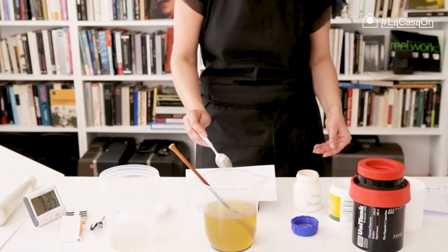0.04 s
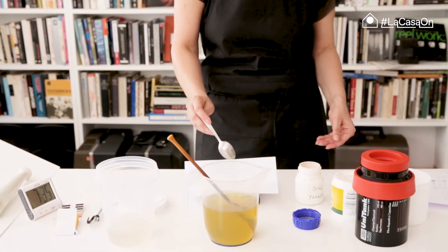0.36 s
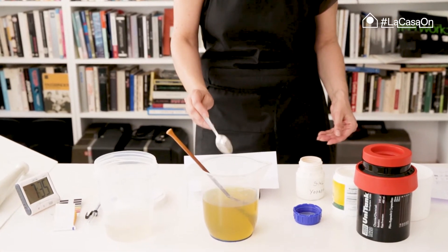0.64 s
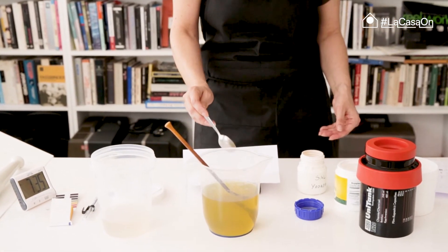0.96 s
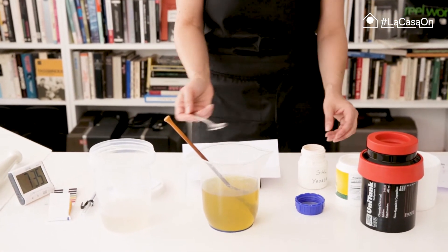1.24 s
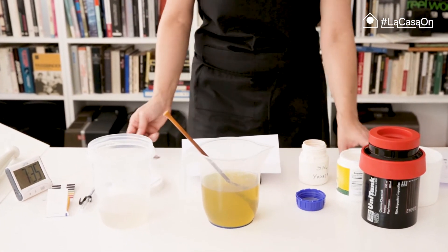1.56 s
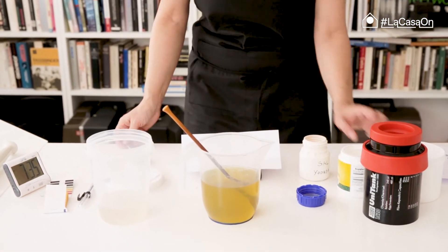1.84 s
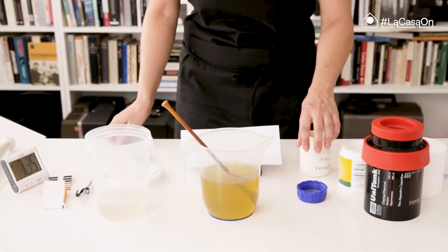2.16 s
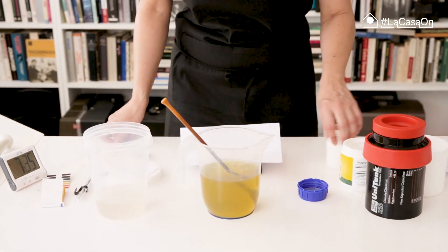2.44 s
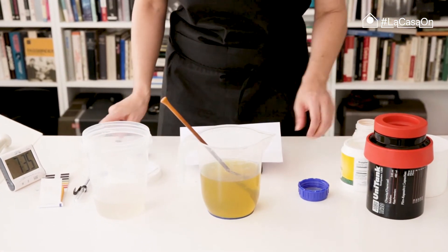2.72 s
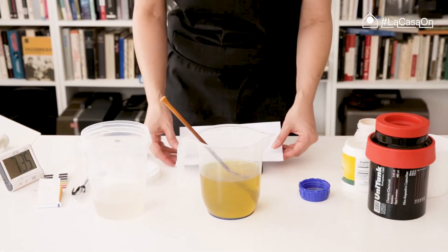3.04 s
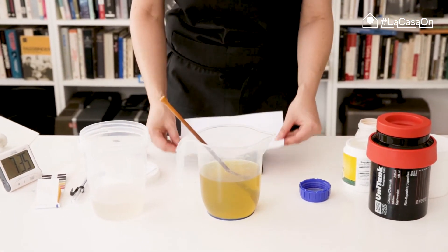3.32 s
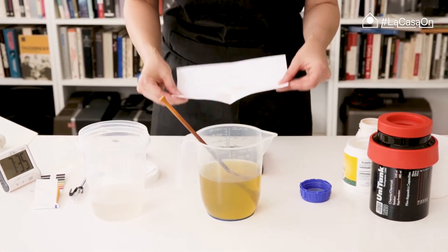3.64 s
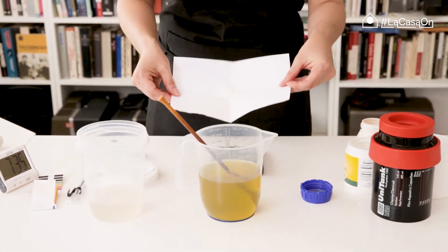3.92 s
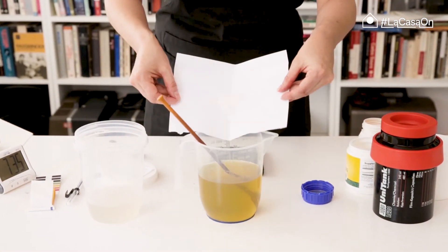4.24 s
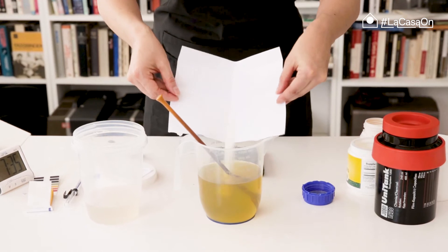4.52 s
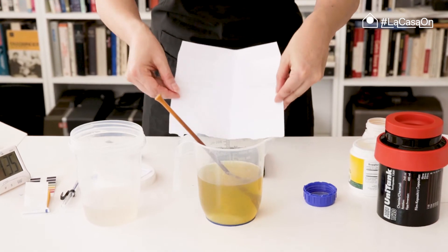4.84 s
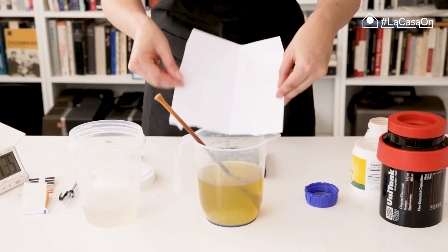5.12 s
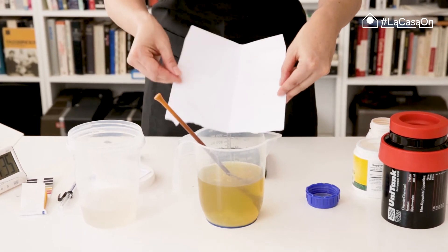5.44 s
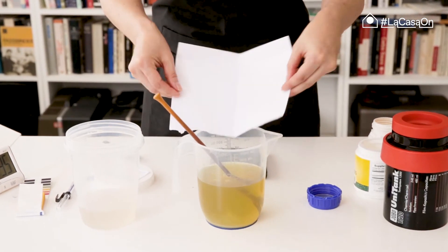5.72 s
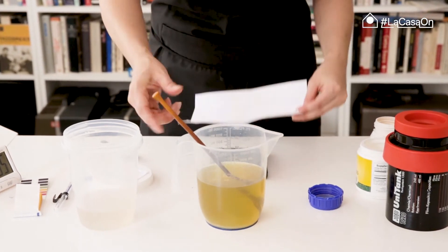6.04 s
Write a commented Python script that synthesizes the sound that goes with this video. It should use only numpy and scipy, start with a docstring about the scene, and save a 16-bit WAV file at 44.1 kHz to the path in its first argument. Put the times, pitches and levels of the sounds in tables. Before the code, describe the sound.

A small, quiet room is heard through one microphone, with faint hiss and soft, low handling bumps. At about 1.7 seconds a spoon lands on the table with a single knock. Around 2.3 seconds fingernails tick on a glass jar, which judders across the tabletop and, from 2.5 to 2.7 seconds, clatters against hollow plastic containers with a faint high ring. This is the loudest moment. Faint finger scuffs follow near 3.1 seconds. A folded sheet of paper buckles at 4.1 seconds, and from about 4.2 to 4.8 seconds salt hisses down it into a jug of liquid, with a few short, sharp plops near 4.5 seconds. From 4.9 to about 6 seconds the sheet is shaken out, snapping, crackling and tapping hollowly on the plastic rim. The last light touches fade by 6.2 seconds. Short room reflections follow each knock.

```python
"""Salt poured from a paper sheet

At a table in a small, quiet room, one microphone hearing each sound directly and off the walls.
A spoon is laid down; a glass salt jar is pushed aside, judders and clatters against plastic containers.
A folded sheet of paper is lifted, and salt hisses down its crease into a plastic jug of liquid,
clumps dropping in with short, sharp plops. The sheet is shaken out, buckling and tapping on the rim."""
import sys
import numpy as np
from scipy import signal
from scipy.fft import rfft, irfft
from scipy.io import wavfile

SR = 44100
rng = np.random.default_rng(int(sys.argv[2]) if len(sys.argv) > 2 else 0)


def output_pcm(signal):
    """Save a mono or channel-first signal as 16-bit PCM at the path in sys.argv[1].

    Samples are clipped to [-1, 1] before scaling.
    """
    pcm = np.clip(np.atleast_2d(signal).T, -1, 1) * 32767
    wavfile.write(sys.argv[1], SR, np.round(pcm).astype(np.int16))


N = 276683
TIME = np.arange(N) / SR

# the jar's blows against the containers: t/s, level/dB, fade/s
REBOUNDS = [(2.5375, 2.5, 0.003), (2.5485, 0.5, .0039), (2.5516, -3.5, 0.0018), (2.5621, -0.5, 0.0015),
            (2.575, 0.5, .0034), (2.5823, -5, 0.0031), (2.597, -3, .0057), (2.614, -7.5, 0.0033),
            (2.627, -3.5, 0.0043), (2.6326, -2.5, 0.0012), (2.682, -8.5, 0.0082)]


def from_db(db):
    """Decibels to gain."""
    return 10 ** (np.asarray(db) / 20)


def unit_energy(x):
    """Scale so that the squares sum to one."""
    return x / np.sqrt(np.sum(x ** 2) + 1e-20)


def at_hz(points, hz):
    """Read a table on a log-frequency axis."""
    f, value = np.transpose(points)
    return np.interp(np.log(np.maximum(hz, 1)), np.log(f), value)


def through(x, response):
    """Pass a signal through an impulse response."""
    return signal.fftconvolve(x, response)[:len(x)]


def butter(x, hz, kind, order=2):
    """Butterworth high-, low- or band-pass."""
    sections = signal.butter(order, np.clip(hz, 20, .45 * SR), kind, fs=SR, output="sos")
    return signal.sosfilt(sections, x)


def add(track, s, sound):
    """Mix a short sound in at time s."""
    start = int(s * SR)
    track[start:start + len(sound)] += sound[:N - start]


def body(colour, modes=(), size=8192):
    """Unit-energy impulse response: a broad colour with resonances standing out of it."""
    hz = np.arange(size // 2 + 1) * SR / size
    power = 1 + sum(from_db(db) ** 2 / (1 + (2 * (hz - f) / width) ** 2) for f, width, db in modes)
    cepstrum = irfft(np.log(from_db(at_hz(colour, hz)) * np.sqrt(power)))
    log_spectrum = rfft(2 * cepstrum[1:size // 2], size) * np.exp(-2j * np.pi * hz / SR)  # minimum phase
    return unit_energy(irfft(np.exp(log_spectrum)))


def noise(colour):
    """Steady coloured noise, rms 1."""
    return through(rng.standard_normal(N), body(colour))


def grains(per_s, spread_db):
    """Random tiny impacts of uneven size, rms 1."""
    sizes = rng.standard_normal(N) * from_db(spread_db * rng.standard_normal(N))
    return unit_energy(sizes * (rng.random(N) < per_s / SR)) * np.sqrt(N)


def contact(fade_s, rise_share=0.053, size=8192):
    """A quickly dying burst of micro-impacts, evened out so that it holds all pitches alike."""
    fade_s, t = max(fade_s, 1e-4), TIME[:size]
    envelope = np.exp(-t / fade_s) * (1 - np.exp(-t / (rise_share * fade_s)))
    phase = np.angle(rfft(envelope * rng.standard_normal(size)))
    flat_burst = irfft(np.exp(1j * phase))
    return unit_energy(flat_burst * np.exp(-t / (10 * fade_s)))


def knocks(rows, response):
    """Contacts (t/s, level/dB, fade/s) on one body."""
    out = np.zeros(N)
    for s, db, fade_s in rows:
        add(out, s, from_db(db) * unit_energy(through(contact(fade_s), response)))
    return out


def stroke(start_s, attack_s, hold_s, release_s):
    """Gain of one even movement: rise, hold, fall."""
    end_s = start_s + attack_s + hold_s + release_s
    return np.clip(np.minimum((TIME - start_s) / attack_s, (end_s - TIME) / release_s), 0, 1)


def swells(rows):
    """Gain of small movements (peak t/s, level/dB, swell/s), each dying away as it grew."""
    gains = (from_db(db) * np.exp(-np.abs(TIME - s) / swell_s) for s, db, swell_s in rows)
    return np.sqrt(sum(gain ** 2 for gain in gains))


def room_tone(level_db=-64.5):
    """The quiet room and the microphone's own hiss."""
    # noise floor spectrum: f/Hz, level/dB
    colour = [(12, -34), (20, -11.5), (90, -10.5), (175, -10.5), (245, -17.5), (416, -18), (686, -22.5),
              (1300, -23.5), (1770, -26.5), (3080, -28), (3640, -29), (14300, -37.5), (15500, -39)]
    return from_db(level_db) * noise(colour)


def room_response(early_db=7.0, early_s=.02, gap_s=0.0033, size=40000):
    """Strong early reflections off table and shelves, then a tail that dies sooner in the treble."""
    # reverberation time: f/Hz, t60/s
    decay_times = [(120, 0.63), (400, 0.82), (1500, 0.75), (3500, 0.67), (6000, 0.58), (10000, 0.51),
                   (15000, 0.24)]
    t, white = TIME[:size], rfft(rng.standard_normal(size))
    octave = np.log2(np.maximum(np.arange(len(white)) * SR / size, 1))
    centres = np.geomspace(100, 16000, 10)
    tail = 0
    for hz, share in zip(centres, np.eye(len(centres))):
        band = irfft(white * np.interp(octave, np.log2(centres), share))
        tail = tail + band * np.exp(-np.log(1000) * t / at_hz(decay_times, hz))
    early_lift = 1 + from_db(early_db) * np.exp(-t / early_s)
    return unit_energy(tail * early_lift * (t > gap_s))


def handling():
    """Sleeves and paper rustle under the fingers, over soft low bumps of body and hands."""
    # spectra of fine friction and of dull bumps: f/Hz, level/dB
    rustle_colour = [(300, 9), (1000, -4), (3000, 1.5), (5500, -4.5), (9000, -8.5), (15000, -20.5)]
    bump_colour = [(25, -10.5), (60, 2), (130, -2.5), (200, -6), (350, -11.5), (700, -42)]
    # the movements behind each: peak t/s, level/dB, swell/s
    rustles = [(1.31, -66, 0.11), (1.9, -58.5, 0.015), (3.22, -66.5, .12), (4.13, -62.5, 0.11),
               (4.92, -55.5, 0.043), (5.09, -58.5, 0.057), (5.26, -49, 0.023), (5.59, -60, 0.093),
               (5.77, -64, 0.12)]
    bumps = [(.2, -62, 0.28), (.86, -60.5, 0.13), (4.76, -60.5, 0.16), (5.2, -66, 0.22), (5.62, -58, .08),
             (5.87, -60.5, 0.1), (6.22, -68, 0.14)]
    friction = through(grains(per_s=8700, spread_db=1.0), body(rustle_colour))
    rumble = through(grains(per_s=320, spread_db=2.0), body(bump_colour))
    return swells(rustles) * friction + swells(bumps) * butter(rumble, 500, "low")


def finger_scuffs(fade_s=0.017, width_octaves=0.22):
    """Fingers brush the things on the table: brief friction in one narrow band."""
    # faint pitched scuffs: t/s, level/dB, f/Hz
    scuffs = [(1.304, -36.5, 1260), (3.055, -31.5, 2100), (3.12, -34.5, 2040)]
    out = np.zeros(N)
    for s, db, hz in scuffs:
        band_hz = hz * 2 ** (width_octaves * np.array([-.5, .5]))
        add(out, s, from_db(db) * unit_energy(butter(contact(fade_s), band_hz, "band")))
    return out


def spoon(squeak_s=1.669, squeak_hz=2720, squeak_db=-29):
    """The spoon squeaks as it touches, then drops and sets the table top ringing."""
    # the spoon lands: t/s, level/dB, fade/s
    landings = [(1.6955, -6, 0.0011), (1.698, -13, 0.0032)]
    # table top spectrum: f/Hz, level/dB
    colour = [(50, -29.5), (150, -6.5), (350, -4.5), (700, -0.5), (1400, 0.5), (2150, -2), (2700, -22),
              (3400, -21.5), (5000, -36), (8000, -34.5), (15000, -51.5)]
    # its resonances: f/Hz, width/Hz, level/dB
    modes = [(325, 170, 1.5), (810, 39, 5.7), (1175, 66, 3.5), (1505, 110, 3.8), (1617, 10, 1),
             (3260, 350, 10.2), (4300, 300, 10.5)]
    t = TIME[:SR // 10]
    ping = np.sin(2 * np.pi * squeak_hz * t) * np.exp(-t / 0.0014)
    squeak = through(ping, contact(0.0021, rise_share=0.53))
    out = knocks(landings, body(colour, modes))
    add(out, squeak_s, from_db(squeak_db) * unit_energy(squeak))
    return out


def fingernails():
    """Nails tick on the glass as the hand meets the jar."""
    # nail contacts: t/s, level/dB, fade/s
    ticks = [(2.3172, -18.5, 0.00073), (2.324, -11.5, 0.00071), (2.331, -25, 0.0028),
             (2.3488, -17.5, 0.0026)]
    # spectrum of nail on glass: f/Hz, level/dB
    colour = [(200, -19.5), (600, -9.5), (1100, -4), (2000, -6), (3700, -5.5), (5000, -3.5), (8200, -3.5),
              (9500, -12.5), (15500, -24)]
    # its resonances: f/Hz, width/Hz, level/dB
    modes = [(5065, 400, 2), (7500, 220, 6)]
    return knocks(ticks, body(colour, modes))


def jar_slide(level_db=-41.5):
    """One push: the jar's foot sticks and slips over the table, catching as it gathers speed."""
    # spectra of the foot juddering and catching: f/Hz, level/dB
    judder_colour = [(40, -54), (120, -12), (190, 0), (260, -2), (450, -4.5), (800, -12.5), (1300, -18.5),
                     (2500, -29), (5000, -60.5)]
    catch_colour = [(300, -11), (800, 4.5), (1500, -6), (3600, -5), (4500, -27), (9000, -48)]
    # the foot catches: t/s, level/dB, fade/s
    catches = [(2.4147, -17.5, 0.0022), (2.433, -22, 0.0069), (2.47, -30, 0.011)]
    push = stroke(start_s=2.329, attack_s=0.12, hold_s=0.236, release_s=0.062)
    slips = through(grains(per_s=1500, spread_db=4.0), body(judder_colour))
    return from_db(level_db) * push * slips + knocks(catches, body(catch_colour))


def rebound_cut_hz(s, hard_hz=13000, soft_hz=3400, settle_s=.028):
    """The first blow is hard and bright, later ones ever duller as the jar settles."""
    return soft_hz + (hard_hz - soft_hz) * np.exp(-(s - REBOUNDS[0][0]) / settle_s)


def jar_clatter():
    """The jar's rebounds shake the hollow plastic containers."""
    # container spectrum: f/Hz, level/dB
    colour = [(50, -36.5), (170, -29.5), (350, -9.5), (800, -4), (1700, -2), (3000, 0), (5200, -6.5),
              (6600, -7.5), (8500, -15.5), (12000, -22), (15500, -36.5)]
    # their resonances: f/Hz, width/Hz, level/dB
    modes = [(826, 33, 7), (1647, 44, 5.5), (1826, 88, 3), (2060, 14, 1.5), (2400, 60, -5), (2538, 18, 3.5),
             (2800, 29.6, 1), (3130, 52, 1.5), (3720, 25, 2.5), (4840, 32, 0), (5520, 130, 3.5),
             (6230, 40, 0)]
    out, plastic = np.zeros(N), body(colour, modes)
    for s, db, fade_s in REBOUNDS:
        blow = butter(contact(fade_s), rebound_cut_hz(s), "low", order=1)
        add(out, s, from_db(db) * unit_energy(through(blow, plastic)))
    return out


def jar_ring(size=32000):
    """Each rebound makes the glass ring; softer contacts put less into the high modes."""
    # modes of the glass: f/Hz, level/dB, t60/s
    modes = [(4780, -15.5, 0.005), (5700, -56.5, 0.63), (5570, -57.5, 0.92), (6206, -50.5, 0.43),
             (8630, -51, .3), (11172, -39.5, 0.384), (12212, -39.5, .36), (12588, -45.5, 0.4),
             (13910, -54, .2), (14972, -47, .22)]
    out, t = np.zeros(N), TIME[:size]
    s, db, _ = np.transpose(REBOUNDS)
    for hz, mode_db, t60 in modes:
        ring = np.sin(2 * np.pi * hz * t) * np.exp(-np.log(1000) * t / t60)
        strengths = from_db(db + mode_db) / np.hypot(1, hz / rebound_cut_hz(s))
        starts = s + rng.random(len(s)) / hz  # scattered within one cycle
        for start, strength in zip(starts, strengths):
            add(out, start, strength * ring)
    return out


def paper_and_plops(broad_octaves=2.83, rim_hz=(580, 990), crease_hz=(2500, 8000),
                    crack_db=-9, thud_db=-17):
    """Paper snaps and salt clumps plop: each a crack and a short rattle in its band, over a low thud."""
    # spectrum of the creased sheet over the jug: f/Hz, level/dB
    colour = [(200, 1), (3000, -2), (9200, -14.5), (11000, -36)]
    # its resonances: f/Hz, width/Hz, level/dB
    modes = [(691, 9.7, 3.6), (848, 18, 3.7), (1070, 41, 2.2), (1705, 42, 1.3), (3280, 1000, 1.8),
             (5080, 310, 7.5), (9000, 530, 11.4)]
    # salt clumps plop into the jug (the three rows from 4.48 to 4.58 s); in the rest the sheet buckles:
    # t/s, level/dB, top f/Hz, fade/s
    broad_hits = [(4.081, -16.5, 2080, .012), (4.379, -24.5, 1940, 0.013), (4.481, -13.5, 2700, 0.017),
                  (4.5776, -4.5, 6100, .0019), (4.5826, -10, 4500, 0.0024), (4.902, -11.5, 2050, 0.027),
                  (4.93, -16, 2550, 0.0067), (5.2302, -24, 3070, 0.0087), (5.329, -11.5, 2010, 0.015),
                  (5.34, -7, 2880, 0.0062), (5.5506, -13.5, 1660, 0.037), (5.804, -16.5, 1960, .014),
                  (5.876, -30, 4000, 0.0091), (6.2002, -31.5, 2660, 0.011)]
    # hollow taps of the sheet's edge on the jug's rim: t/s, level/dB, fade/s
    rim_taps = [(3.33, -37, .012), (4.29, -27.5, 0.023), (5.0476, -26.5, 0.0046), (5.065, -26.5, .0073),
                (5.12, -22, 0.031), (5.249, -13.5, 0.026), (5.283, -17.5, 0.035), (5.7878, -29, .0056),
                (5.914, -21.5, .0069), (6.0558, -27.5, 0.014)]
    # bright crackles of small creases: t/s, level/dB, fade/s
    crackles = [(5.2481, -15.5, 0.0017), (5.254, -21, 0.0084), (5.546, -24.5, .025), (5.685, -18, 0.0077)]
    out, response = np.zeros(N), body(colour, modes)
    hits = [(s, db, top_hz / 2 ** broad_octaves, top_hz, fade_s) for s, db, top_hz, fade_s in broad_hits]
    hits += [(s, db, *rim_hz, fade_s) for s, db, fade_s in rim_taps]
    hits += [(s, db, *crease_hz, fade_s) for s, db, fade_s in crackles]
    for s, db, low_hz, high_hz, fade_s in hits:
        burst = from_db(crack_db) * response + through(contact(fade_s, rise_share=0.2), response)
        hit = butter(butter(burst, high_hz, "low", order=4), low_hz, "high", order=3)
        thud = butter(butter(burst, 360, "low"), 200, "high", order=4)
        add(out, s, from_db(db) * (unit_energy(hit) + from_db(thud_db) * unit_energy(thud)))
    return out


def salt(level_db=-39, clump_db=1.2, trickle_power=1.65):
    """Thousands of crystals skitter down the tilted paper and into the liquid, in small clumps."""
    # spectrum of the hiss: f/Hz, level/dB
    colour = [(500, -17.5), (1000, -12.5), (1800, -6.5), (3000, 2.5), (4800, 1), (7000, -2), (10000, -3),
              (13500, -7.5), (16000, -10.5)]
    pour = stroke(start_s=4.209, attack_s=0.27, hold_s=0.11, release_s=0.18)
    flow = pour ** trickle_power  # begins and ends as a trickle
    clumps = from_db(clump_db * noise([(40, 0), (300, -40)]))  # flutter, mostly below 40 Hz
    crystals = through(grains(per_s=8000, spread_db=0.5), body(colour))
    return from_db(level_db) * flow * clumps * crystals


def scene():
    """Every source reaches the microphone directly and by way of the room; the salt's hiss is driest."""
    room = room_response()

    def in_room(x, wet_db):
        """Direct sound plus reflections."""
        return x + from_db(wet_db) * through(x, room)

    mix = room_tone() + in_room(handling() + finger_scuffs(), wet_db=-2)
    mix += in_room(spoon(), wet_db=2.5)
    mix += in_room(fingernails(), wet_db=-3)
    mix += in_room(jar_slide() + jar_clatter(), wet_db=2.5)
    mix += in_room(jar_ring(), wet_db=-4)
    mix += in_room(paper_and_plops(), wet_db=-5.5)
    mix += in_room(salt(), wet_db=-11)
    return mix[None]


def record(dry):
    """The treble is cut steeply above 15.8 kHz."""
    return signal.sosfilt(signal.ellip(10, .1, 70, 15800, fs=SR, output="sos"), dry)


dry = scene()
out = record(dry)
output_pcm(out)
```